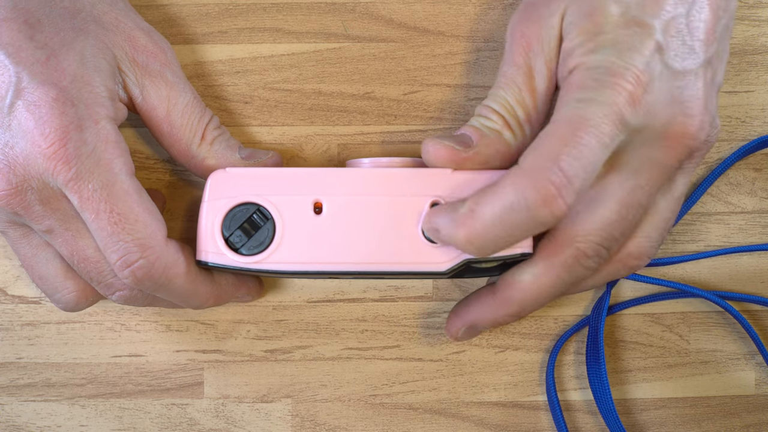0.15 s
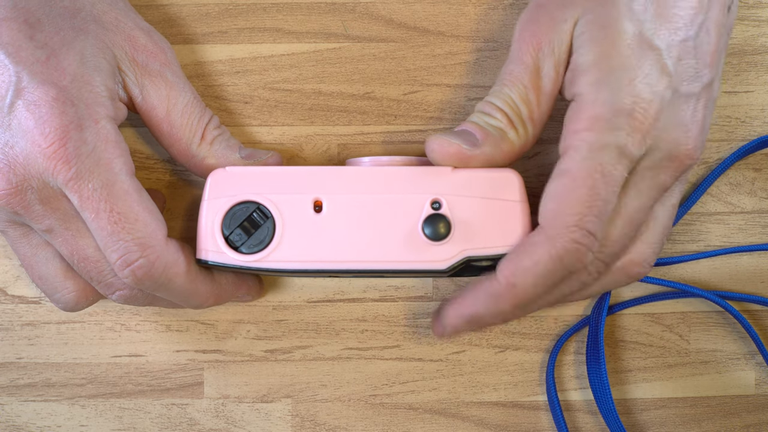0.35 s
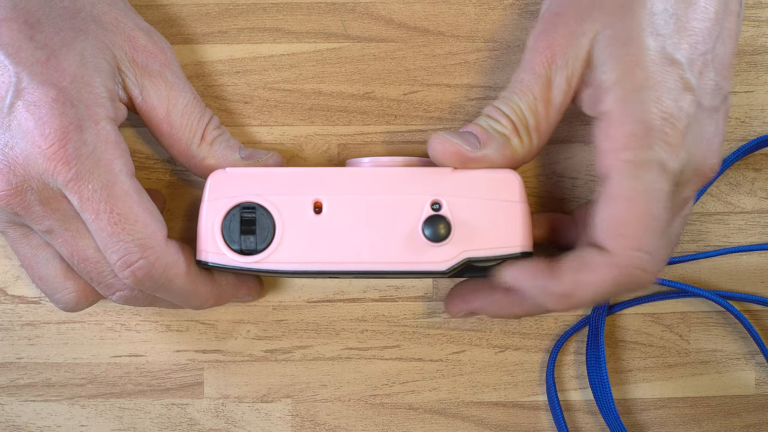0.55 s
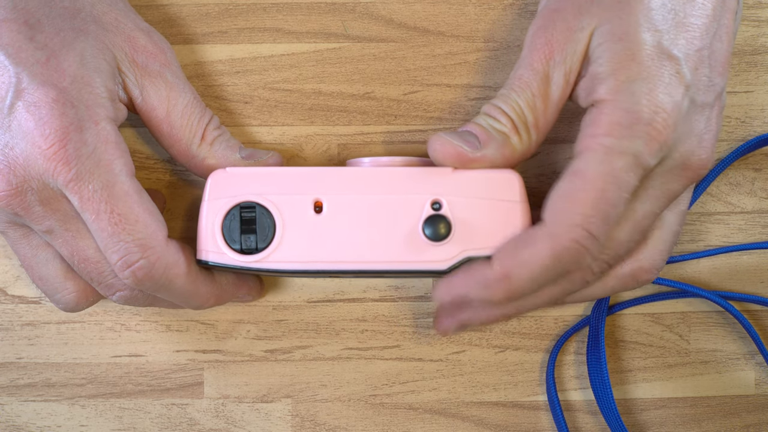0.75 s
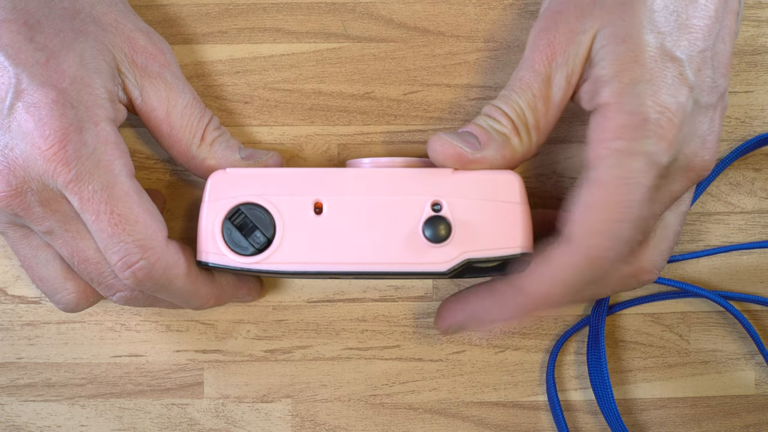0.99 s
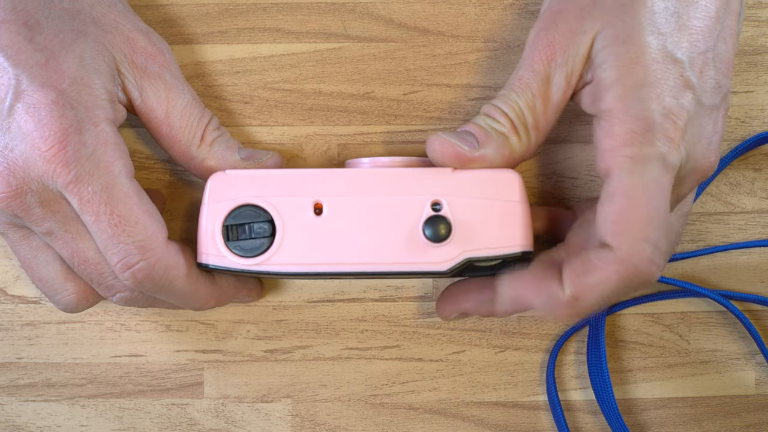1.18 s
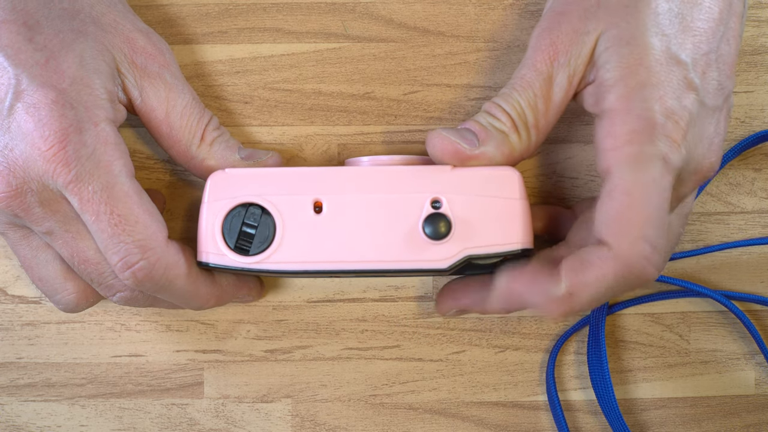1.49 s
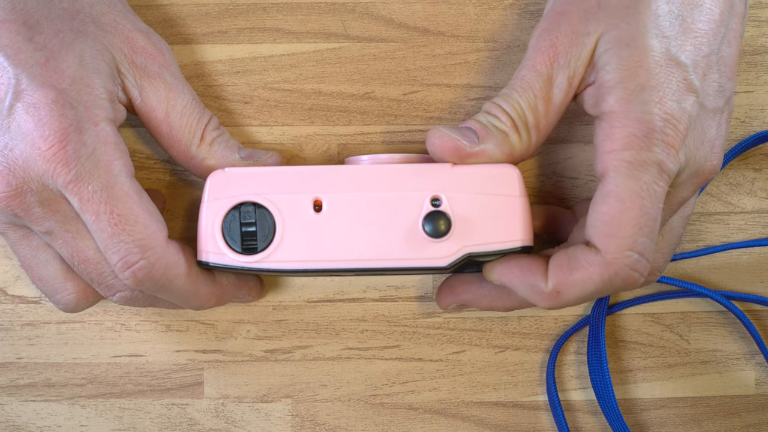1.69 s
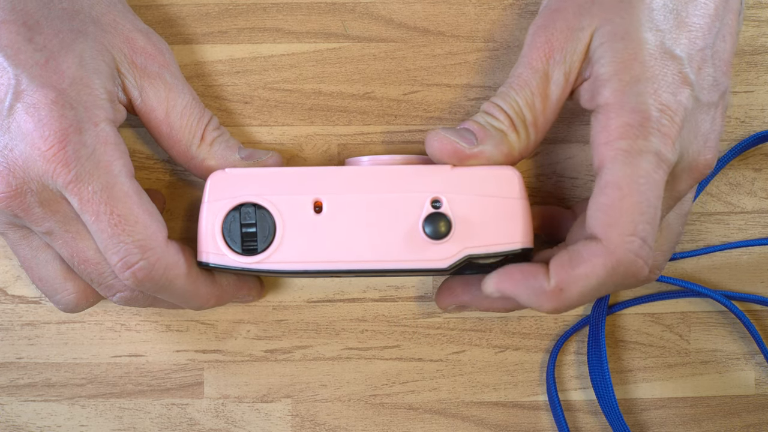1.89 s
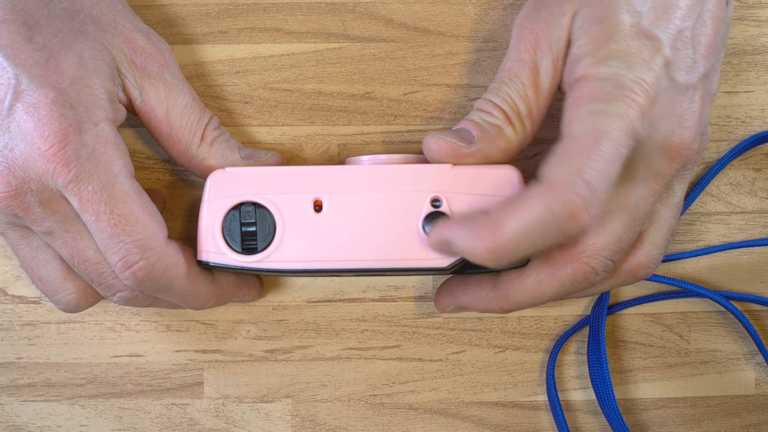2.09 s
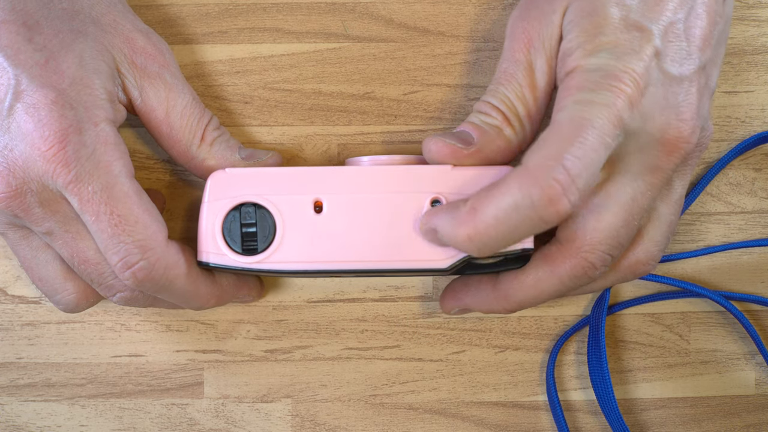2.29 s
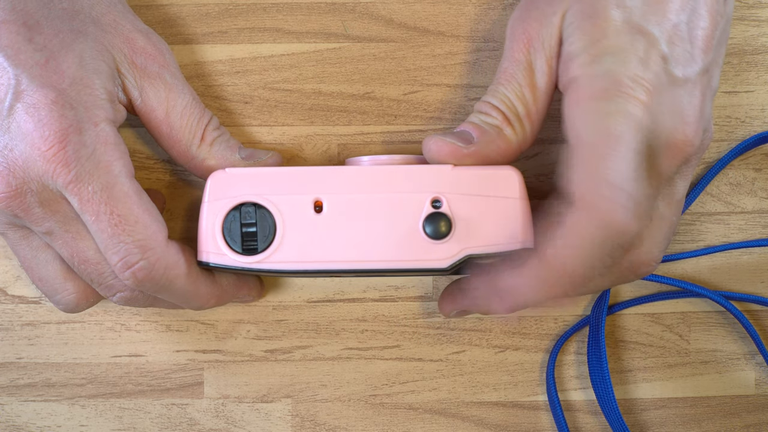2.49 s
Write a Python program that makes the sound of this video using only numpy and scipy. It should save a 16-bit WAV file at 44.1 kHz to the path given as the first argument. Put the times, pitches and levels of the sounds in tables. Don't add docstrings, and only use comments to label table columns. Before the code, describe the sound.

A small plastic camera's winding wheel ratchets, close-miked. The shutter snaps at 0.12 s, then the button softly releases at 0.3. Bursts of fast, dry, hollow clicks come near 0.6, 0.9, 1.15, 1.42 and 1.7, ending in a loud lock snap at 1.76. Faint finger taps, rubbing and table thuds lie between. A tiny crack sounds at 2.1, the shutter again at 2.38, over quiet room hum.

```python
import sys
import numpy as np
from scipy import signal
from scipy.fft import rfft, irfft
from scipy.io import wavfile
from scipy.ndimage import uniform_filter1d

SR = 44100
rng = np.random.default_rng(int(sys.argv[2]) if len(sys.argv) > 2 else 0)


def store_pcm(level_fs):
    pcm = np.round(np.clip(level_fs, -1, 1) * 32767).astype(np.int16)
    wavfile.write(sys.argv[1], SR, np.atleast_2d(pcm).T)


def elevation(decibels):
    levels = np.asarray(decibels, float)
    return 10 ** (levels / 20)


N = 116865

# f/Hz, width/Hz, level/dB
SHELL = [(620, 110, -16), (900, 160, -7), (1110, 150, 0), (1250, 130, -2)]
# f/Hz, width/Hz, level/dB
PLATE = [(1950, 250, -12), (2230, 200, -5), (2450, 170, -3), (2700, 150, 0), (3300, 400, -13)]
# f/Hz, width/Hz, level/dB
BUTTON = [(2100, 100, -15), (2460, 450, 0), (2675, 150, 0.5), (3470, 100, -20)]
HARD_RISE, SKIN_RISE = 0.7, 4.0
SHELL_CUT_HZ = 828


def evened(x):
    return x / np.sqrt(np.mean(x ** 2) + 1e-20)


def read(points, hz):
    f, value = np.transpose(points)
    return np.interp(np.log(hz + 1), np.log(f + 1), value)


def add(mix, s, sound):
    part = mix[round(s * SR):][:len(sound)]
    part += sound[:len(part)]


def high_pass(x, order, cut_hz):
    return signal.sosfilt(signal.butter(order, cut_hz, "high", fs=SR, output="sos"), x)


def ring(modes, push, seconds):
    detune, spread_db = 0.01, 1.8
    t = np.arange(round(seconds * SR))[:, None] / SR
    hz, width, db = np.transpose(modes)
    pitch_off, level_off = rng.standard_normal((2, len(modes)))
    decay = np.exp(-np.pi * width * t)
    tones = decay * np.sin(2 * np.pi * hz * (1 + detune * pitch_off) * t)
    strength = width * elevation(db + spread_db * level_off)
    out = signal.fftconvolve(tones @ strength, push)
    return out / abs(out).max()


def rattle(seconds, rise=HARD_RISE):
    scrape_share, scrape_stretch = 0.14, 4.0
    u = np.arange(1, 2200) / SR / max(seconds, 1e-4)
    fade = np.exp(-u)
    if rise < SKIN_RISE:
        fade = fade + scrape_share * np.exp(-u / scrape_stretch)
    return (1 - np.exp(-u / rise)) * fade * rng.standard_normal(len(u))


def click(part, crack_db, top_hz, rise, s, tick_db, shell_db, plate_db, rattle_s=0.0014, plate=PLATE):
    crack_low_hz, body_trim_db = 3230, 0.5
    push = rattle(rattle_s, rise)
    shake = rattle(rattle_s * 1.6, rise)
    tick = ring(part, push, 0.03)
    band = signal.butter(3, [crack_low_hz, min(top_hz, 20000)], "band", fs=SR, output="sos")
    crack = signal.sosfilt(band, push)
    tick[:len(crack)] += elevation(crack_db) * crack / abs(crack).max()
    body = elevation(shell_db + body_trim_db) * ring(SHELL, shake, 0.03)
    body = body + elevation(plate_db + body_trim_db) * ring(plate, shake, 0.03)
    return s, elevation(tick_db) * np.c_[tick / abs(tick).max(), body]


def shutter(out):
    # f/Hz, width/Hz, level/dB
    blade = [(5180, 600, 8), (6520, 470, 5.5), (8000, 2400, 6.5), (10900, 400, -15), (13500, 510, 4)]
    # t/s, tick level/dB, shell level/dB, plate level/dB (both relative to the tick), rattle/s
    blows = [
        (0.1194, -21, -26.5, 4.5, 0.0018),
        (0.124, -9, -12, -10, 0.0012),
        (0.1325, -12.5, -16, -21.5, 0.0029),
        (1.756, -5.5, -9.5, -12, 0.0014),
        (1.766, -44, -17, 13.5, 0.00404),
        (2.3756, -21.5, -11, 7, 0.0014),
        (2.38, -11, -6.5, -5, 0.0017),
        (2.3875, -13, -26.5, -50, 0.0036),
    ]
    for row in blows:
        add(out, *click(blade, 4, 12500, HARD_RISE, *row, plate=BUTTON))


def ratchet(out):
    # f/Hz, width/Hz, level/dB
    pawl = [(4750, 450, -14), (5700, 450, -15), (7600, 330, -5), (9900, 450, -12), (10600, 400, -13),
            (12450, 260, 1.5), (13350, 340, 1), (14350, 450, -4)]
    # t/s, tick level/dB, shell and plate level/dB (relative to the tick)
    teeth = [(.5772, -21, -20, -13), (.5957, -17, -18, -15), (.6083, -19, -18, -15),
             (.617, -18.5, -18, -15), (.624, -19, -16, -14), (.63, -18, -16, -14),
             (.6362, -18, -16, -13), (.6433, -21, -14, -10), (.8891, -22, -14, -9),
             (.8986, -19, -14, -12), (.907, -20, -14, -11), (.9156, -20, -14, -11),
             (.9235, -21, -13, -10), (.9318, -20, -13, -10), (1.1451, -18, -20, -14),
             (1.1563, -17.5, -16, -15), (1.1653, -19, -12, -12), (1.1732, -20, -12, -13),
             (1.1808, -20, -16, -14), (1.1912, -21, -16, -6), (1.2053, -26, -10, 0),
             (1.4146, -22, -8, -12), (1.4246, -20, -10, -14), (1.4306, -17, -13, -16),
                  (1.4355, -17, -13, -16), (1.4396, -16.5, -13, -16), (1.4443, -19, -14, -13),
                  (1.449, -19, -14, -11), (1.4583, -19, -16, -8), (1.7028, -18, -14, -14),
                  (1.714, -21, -14, -13), (1.724, -20, -14, -12), (1.7325, -20, -14, -12),
                  (1.7428, -18, -13, -12)]
    # f/Hz, width/Hz, level/dB
    lock_modes = [(850, 170, -2), (1010, 200, -6), (1230, 130, 0)]
    trim_db = [0, -2.5, -1.5]
    for s, *levels in teeth:
        add(out, *click(pawl, -12, 14230, HARD_RISE, s, *np.add(levels, trim_db)))
    add(out[:, 1], 1.7568, elevation(-8.5) * ring(lock_modes, np.hanning(14), 0.04))


def fingers(out):
    # f/Hz, width/Hz, level/dB
    skin = [(4550, 580, -2), (5660, 2600, 3.5), (8000, 2700, -2), (12300, 1800, -21.5)]
    # t/s, tick level/dB, shell and plate level/dB (relative to the tick), rattle/s
    touches = [
        (0.0566, -66.5, 17.5, 13, 0.0021),
        (0.0735, -69, -0.5, 9, 0.0053),
        (0.2689, -50, 4, 3.5, 0.0042),
        (0.424, -60, 5, 2, 0.0034),
        (0.431, -59, 10, 5.5, 0.0028),
        (0.654, -44.5, 10, -12.5, 0.0017),
        (0.6661, -47.5, 0, 3, 0.0017),
        (1.2108, -37.5, -3.5, -9, 0.0019),
               (0.101, -52, 4, 1, .003),
        (0.116, -39.5, 12, -3.5, .002),
        (0.203, -59.5, 14, 3, 0.0022),
        (0.283, -52.5, -6, -3, .003),
        (0.8397, -58.5, 8.5, 5.5, 0.0013),
        (2.332, -71, -0.5, 10.5, .003),
        (2.361, -61.5, 24.5, 13, .003),
        (2.37, -46, 0.5, 7.5, .002),
        (1.0988, -62, 14, -8, 0.0051),
    ]
    taps = [(0.9916, -39.5, -7.5, -8.5, 0.0019), (1.259, -39, -16, -12, 0.0022), (1.392, -52, 1, 3, 0.0013),
            (1.56, -47, 2, -3.5, 0.0011), (1.689, -51.5, -3, -3, 0.0014), (1.9721, -58.5, 16, -2.5, .0006),
            (2.185, -60.5, 1, 5.5, 0.00051), (2.188, -57.5, 7.5, 1.5, 0.00087),
            (2.5125, -51, 3, -8, 0.00064)]
    returns = [
        (0.2965, -50.5, 7.5, 17, 0.0012),
        (0.3, -45, -8.5, 1.5, 0.0029),
        (2.5318, -59.5, 16, 33.5, 0.00094),
        (2.5352, -32, -15, -13, 0.0028),
    ]
    snaps = [
        (1.3601, -39.5, -10.5, -8, 0.0039),
        (1.365, -53.5, 9, -5, 0.0015),
        (1.5614, -34, -3.5, -18, 0.0019),
        (1.6606, -39, -8.5, -12, 0.0021),
        (1.9012, -46.5, 11, -3, 0.0018),
        (2.5182, -40, -1.5, -4, 0.0019),
    ]
    for row in touches + taps:
        add(out, *click(skin[:3], -5, 7000, SKIN_RISE, *row))
    for row in returns:
        add(out, *click(skin[:3], -5, 7000, SKIN_RISE, *row, plate=BUTTON))
    for row in snaps:
        add(out, *click(skin, -9, 14000, HARD_RISE, *row))


def thumb_lifts(out):
    # t/s, level/dB, swell/s
    lifts = [
        (0.9909, -34, 0.0022),
        (1.2652, -35.5, .006),
        (1.5664, -32, 0.0053),
    ]
    for s, db, swell_s in lifts:
        swell = np.exp(np.arange(-800, 0) / SR / swell_s)
        shake = swell * rng.standard_normal(800)
        add(out[:, 1], s - len(shake) / SR, elevation(db) * ring(SHELL[2:], shake, 0.03))


def rubbing():
    # start t/s, length/s, level/dB
    rubs = [
        (0.538, 0.017, -76.5),
        (.58, 0.079, -47.5),
        (0.845, .052, -62.5),
        (0.894, .052, -44),
        (1.096, .047, -65),
        (1.15, 0.069, -45.5),
        (1.415, .052, -43),
        (1.705, .047, -48),
    ]
    # f/Hz, level/dB per Hz
    rub_colour = [(600, -11.5), (1100, -5.5), (2500, -2.5), (4000, -10), (7600, -2.5), (9000, -14),
                  (12500, -9), (16000, -13)]
    fade_in_s, fade_out_s, grain_db = 0.006, 0.0027, 0.5
    t, hz = np.arange(N) / SR, np.fft.rfftfreq(N, 1 / SR)
    grains = rng.standard_normal(N) * elevation(grain_db * np.minimum(rng.exponential(1, N), 4))
    hiss = evened(irfft(rfft(grains) * elevation(read(rub_colour, hz)) * (hz > 500), N))
    strokes = np.zeros(N)
    for s, length, db in rubs:
        shape = np.minimum((t - s) / fade_in_s, (s + length - t) / fade_out_s + 1)
        strokes += elevation(db) * np.clip(shape, 0, 1)
    return hiss * strokes


def clunks():
    # t/s, level/dB, f/Hz
    knocks = [(.125, -49, 170), (0.621, -52, 300), (0.642, -41.5, 600), (.892, -47, 347), (.92, -46, 600),
              (1.16, -39, 580), (1.184, -41.5, 380), (1.208, -33.5, 607), (1.209, -44.5, 367),
              (1.425, -38, 400), (1.44, -41, 633), (1.449, -38, 410), (1.703, -35, 450), (1.758, -35, 450),
              (2.1135, -46, 404), (2.382, -54.5, 175.5)]
    # f as a multiple of the pitch, width/Hz, level/dB
    cavity = [(.78, 70, -6), (1, 60, 0), (1.35, 90, -8)]
    out = np.zeros(N)
    for s, db, hz in knocks:
        knock = ring(np.multiply(cavity, [hz, 1, 1]), rattle(0.0023), 0.04)
        add(out, s, elevation(db) * high_pass(knock, 4, 0.8 * hz))
    return out


def varnish_pop(out):
    # f/Hz, width/Hz, level/dB
    pop_ring = [(3830, 307, -0.5), (1827, 300, 3)]
    pop_s, pop_db, width_s = 2.113, -33, 0.00007
    t = np.arange(-40, 41) / SR
    add(out, pop_s - 0.001, -elevation(pop_db) * np.exp(-(t / width_s) ** 2))
    add(out, pop_s, elevation(pop_db - 9.5) * ring(pop_ring, rattle(0.001), 0.02))


def camera():
    out = np.zeros((N, 2))
    shutter(out)
    ratchet(out)
    fingers(out)
    thumb_lifts(out)
    out[:, 0] += rubbing()
    parts, body = high_pass(out.T, 4, SHELL_CUT_HZ)
    varnish_pop(parts)
    return parts, body + clunks()


def table():
    # t/s, level/dB
    thuds = [(0.431, -55.5), (0.839, -44.5), (0.863, -46), (1.098, -44.5), (1.126, -46.5), (1.364, -51.5),
             (1.577, -58), (1.659, -52), (1.93, -57.5), (2.079, -59.5), (2.386, -58)]
    start_hz, end_hz, sag_s = 119, 76.8, 0.015
    push_s, t60_s, overtone_db, wobble_depth = 0.006, 0.36, -6, 0.3
    out, t = np.zeros(N), np.arange(SR // 2) / SR
    pitch = end_hz + (start_hz - end_hz) * np.exp(-t / sag_s)
    turn = 2 * np.pi * np.cumsum(pitch) / SR
    rise, decay_db = 1 - np.exp(-t / push_s), -60 * t / t60_s
    for s, db in thuds:
        overtone = np.sin(1.6 * turn + 2 * np.pi * rng.random())
        tone = np.sin(turn) + elevation(overtone_db + decay_db) * overtone
        wobble = 1 + wobble_depth * np.interp(t, np.linspace(0, 0.5, 40), rng.standard_normal(40))
        add(out, s, elevation(db + decay_db) * rise * wobble * tone)
    return out


def room(x):
    # f/Hz, t60/s
    room_decay = [(300, 0.6), (1000, 0.18), (2500, 0.25), (6000, 0.23), (14600, 0.22)]
    gap_s, scatter_hz = 0.0039, 300
    hz, t, z = signal.stft(rng.standard_normal(SR // 2), SR, nperseg=128)
    fade = elevation(-60 * t / read(room_decay, hz)[:, None])
    tail = signal.istft(z * fade, SR, nperseg=128)[1]
    tail = np.append(np.zeros(round(gap_s * SR)), tail / np.linalg.norm(tail))
    wet = signal.fftconvolve(x, tail)[:N]
    drift = np.cumsum(rng.standard_normal(N)) * np.sqrt(2 * np.pi * scatter_hz / SR)
    blurred = (signal.hilbert(wet) * np.exp(1j * drift)).real
    return high_pass(blurred, 2, SHELL_CUT_HZ)


def floor():
    # f/Hz, level/dB per Hz
    hush = [(25, -14), (92, -2.5), (277, -10.5), (607, -5), (1330, -12), (1790, -17), (8000, -30.5),
            (16000, -28.5)]
    # f/Hz, width/Hz, level/dB
    hums = [(73.6, 5.7, -75.5), (126, 10, -73.5), (610, 71, -68.5), (10100, 120, -95.5)]
    hush_db, patchy_db = -65.5, 2
    frames, hz = N // 512 + 5, np.fft.rfftfreq(2048, 1 / SR)
    a, b, patches = rng.standard_normal((frames, 1025, 3)).T
    patches = uniform_filter1d(patches, size=16, axis=0)
    patches = evened(uniform_filter1d(patches, size=6, axis=1))
    z = (a + 1j * b) * elevation(read(hush, hz)[:, None] + patchy_db * patches)
    out = elevation(hush_db) * evened(signal.istft(z, nperseg=2048, noverlap=1536)[1][:N])
    for tone_hz, width, db in hums:
        r, w = np.exp(-np.pi * width / SR), 2 * np.pi * tone_hz / SR
        resonator = [1, -2 * r * np.cos(w), r * r]
        out = out + elevation(db) * evened(signal.lfilter([1, 0, -1], resonator, rng.standard_normal(N)))
    return out


def scene():
    parts, body = camera()
    sent = parts + elevation(-1.5) * body
    return (parts + body + elevation(-14.5) * room(sent) + table() + floor())[None]


def band_limit(x):
    return signal.sosfilt(signal.butter(12, 16990, fs=SR, output="sos"), x)


def record(dry):
    thin = high_pass(dry, 2, 35)
    low_pass = signal.firwin(255, 15800, window=("kaiser", 8), fs=SR)
    mix = signal.oaconvolve(thin, low_pass[None], "same")
    return band_limit(mix)


dry = scene()
out = record(dry)
store_pcm(out)
```